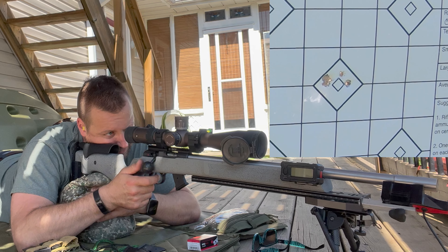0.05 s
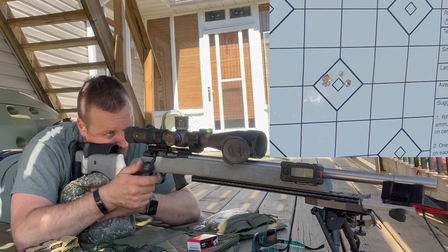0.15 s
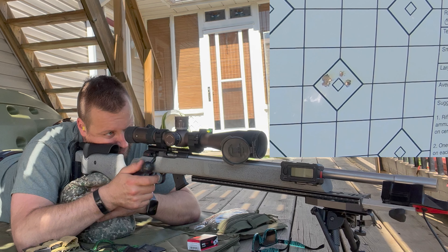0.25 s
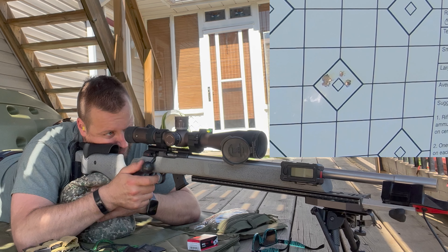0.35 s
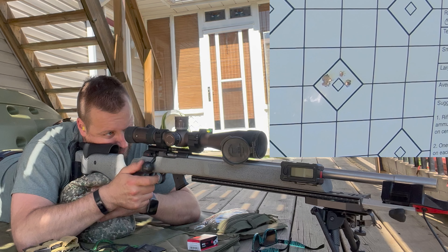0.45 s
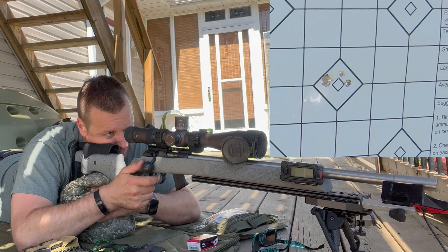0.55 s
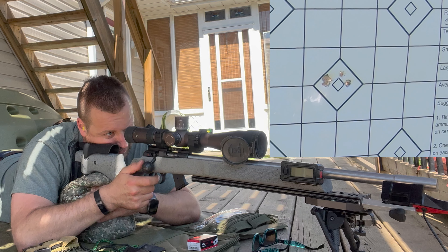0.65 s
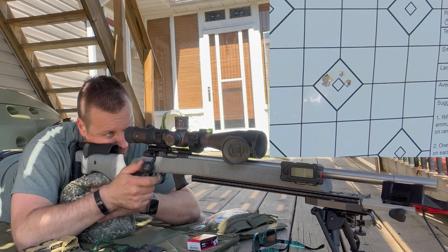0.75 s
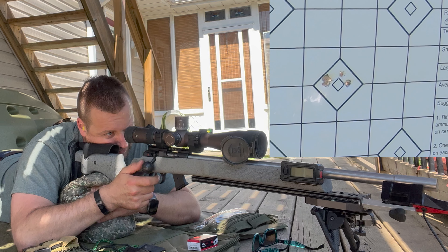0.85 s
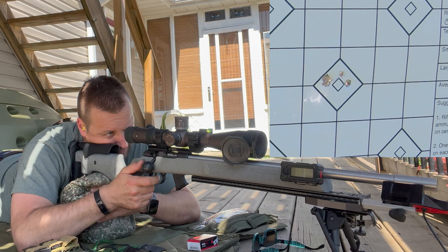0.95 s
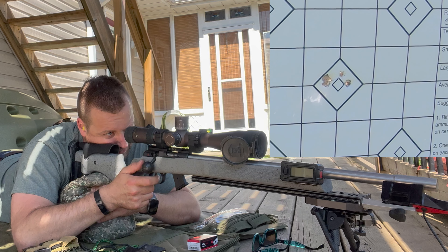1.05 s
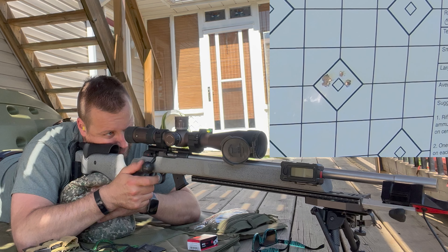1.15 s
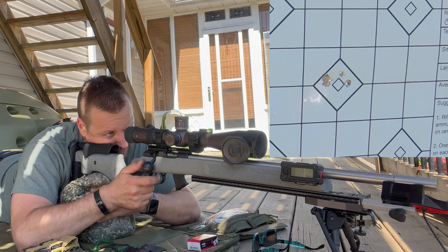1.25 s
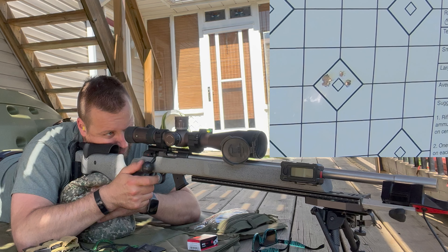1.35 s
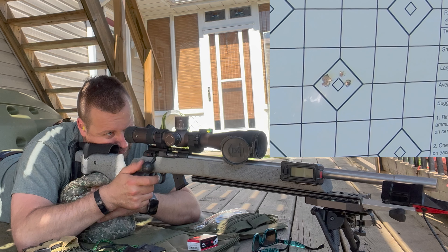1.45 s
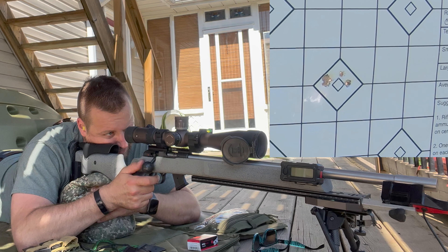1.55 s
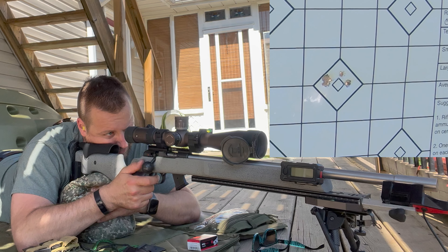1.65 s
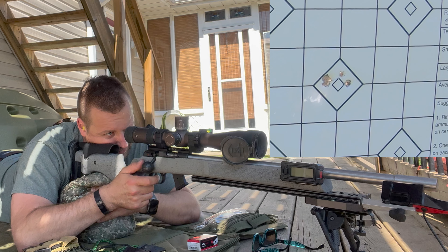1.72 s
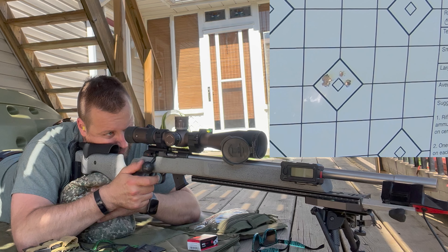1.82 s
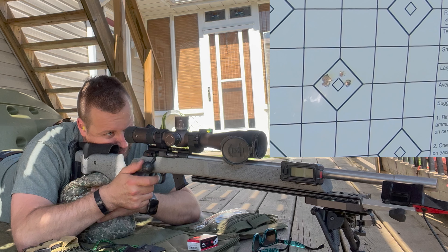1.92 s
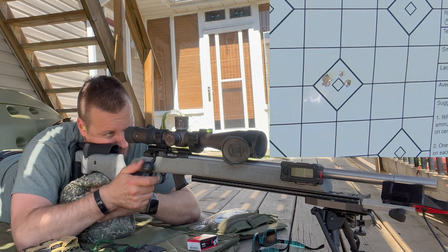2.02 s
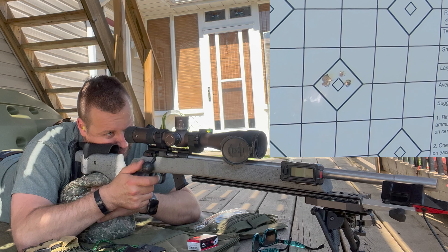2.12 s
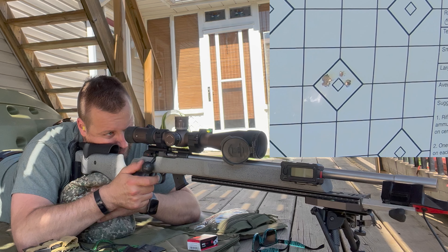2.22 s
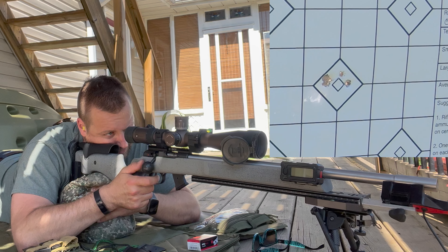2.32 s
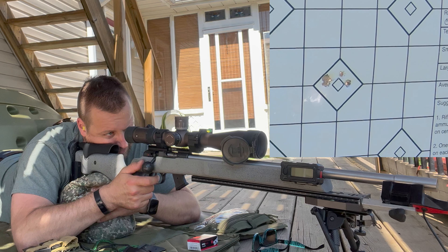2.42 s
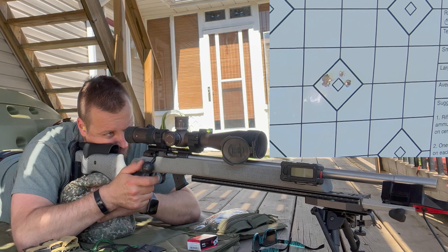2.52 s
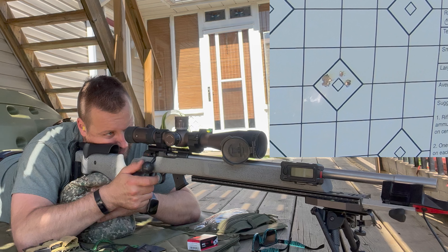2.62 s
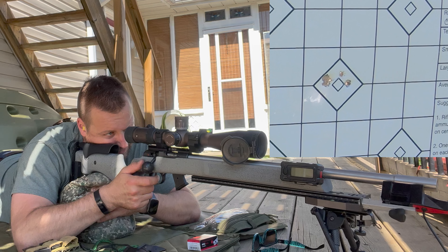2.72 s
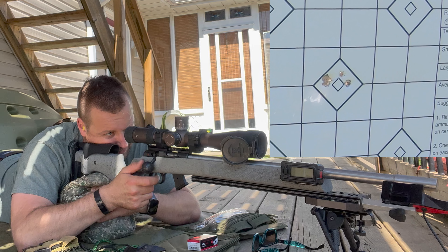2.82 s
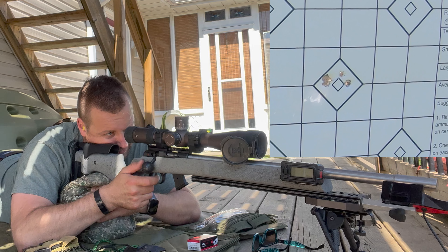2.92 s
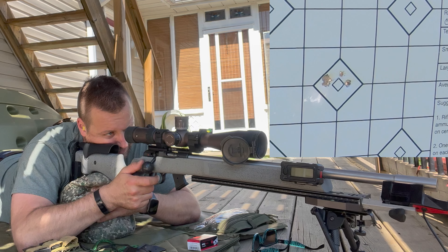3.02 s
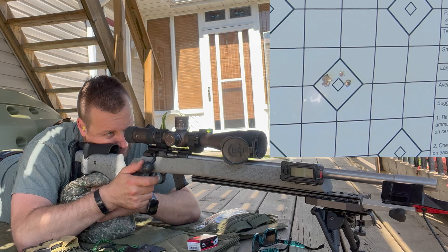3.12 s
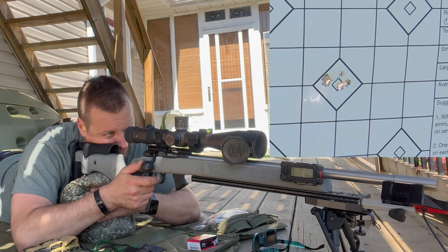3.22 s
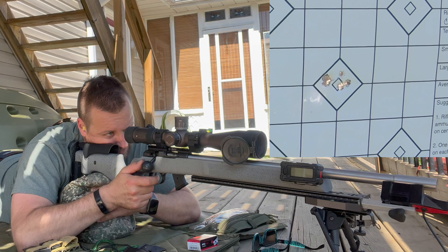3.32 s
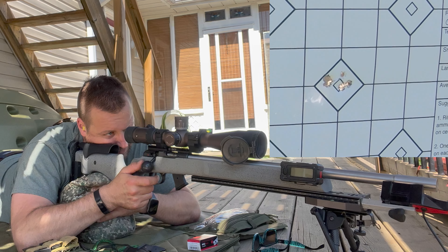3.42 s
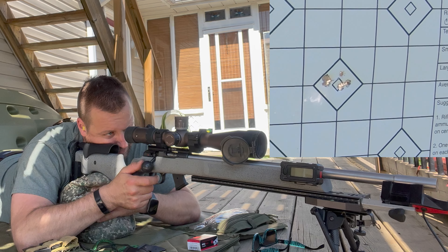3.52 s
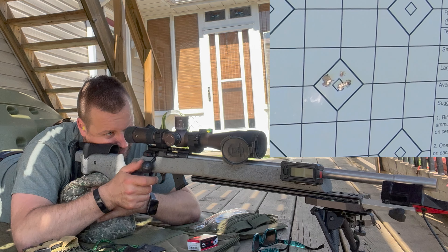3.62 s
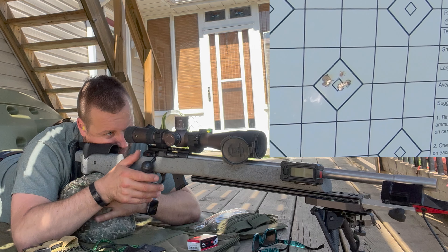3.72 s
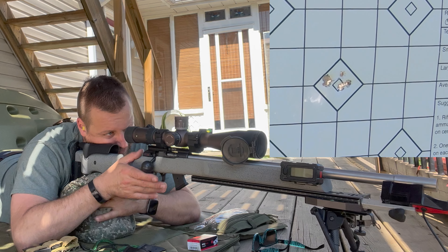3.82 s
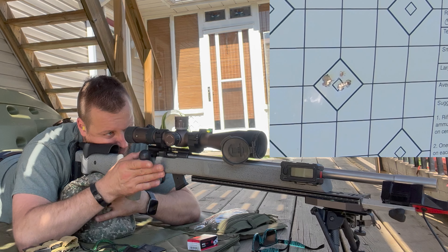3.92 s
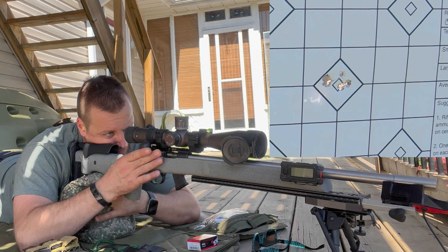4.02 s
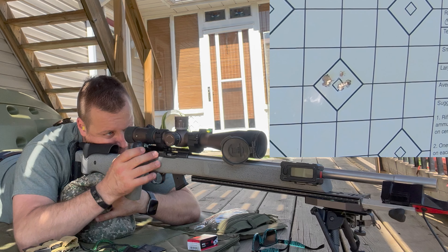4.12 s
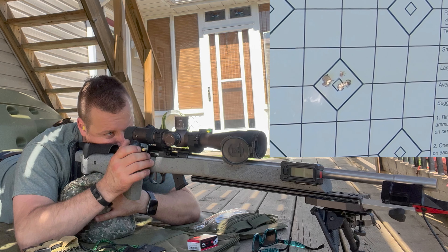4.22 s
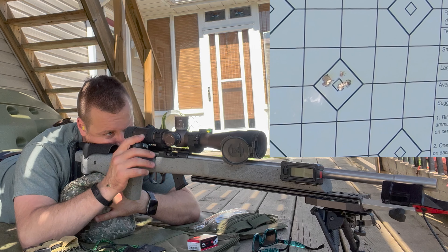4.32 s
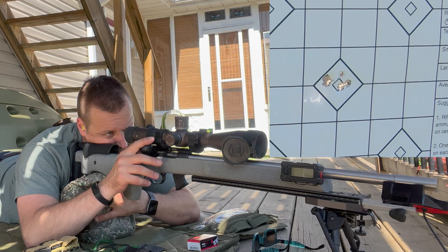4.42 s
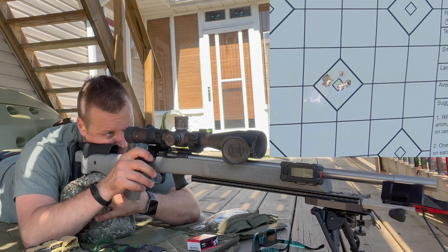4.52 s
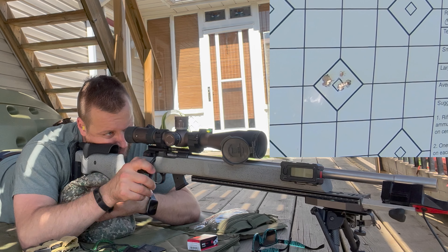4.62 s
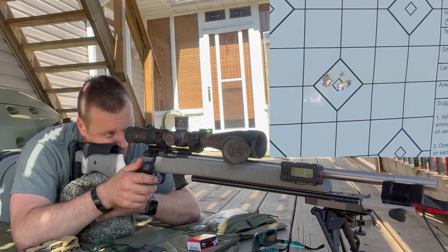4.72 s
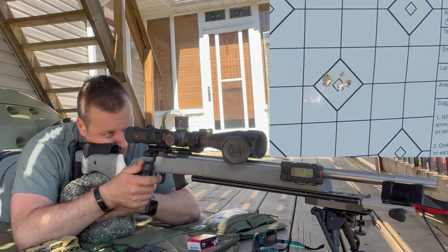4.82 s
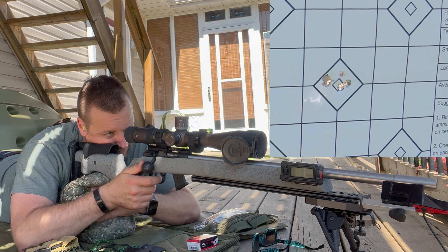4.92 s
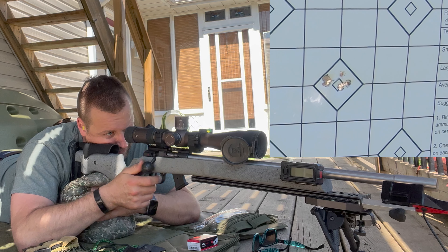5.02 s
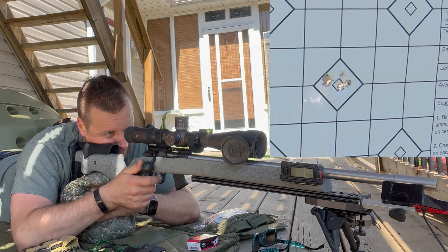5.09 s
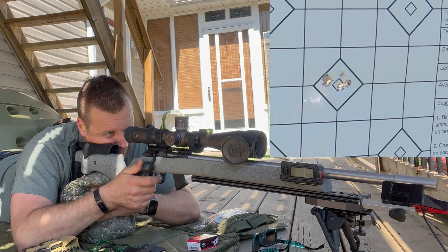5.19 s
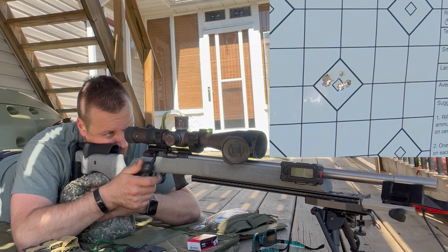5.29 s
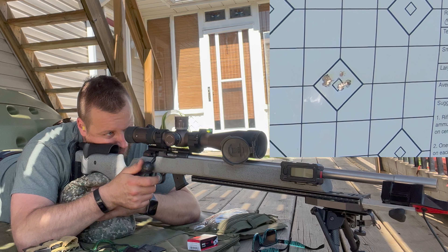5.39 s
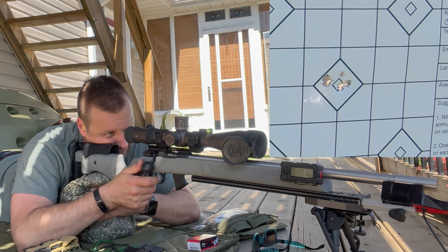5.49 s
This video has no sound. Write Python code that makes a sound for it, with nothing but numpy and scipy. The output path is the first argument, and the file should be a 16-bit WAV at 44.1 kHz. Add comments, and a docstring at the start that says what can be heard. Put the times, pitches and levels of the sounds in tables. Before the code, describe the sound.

A quiet outdoor porch for the first three seconds: a very faint throbbing low hum, soft open-air wash, thin hiss and almost inaudible, evenly spaced high bird peeps until about 2.2 s. At 3.07 s a close suppressed rifle shot bursts out, a low thump leading into a dry, sharp crack, with quick slap echoes off the house and a deep roll dying away. At 3.33 s struck steel answers from downrange with a bright, shimmering ping, and a faint echo around 3.7 s. The microphone's level dips after the blast and recovers. From 3.8 to 4.6 s the bolt is worked: hard clacks near 3.94 and 4.10, short metal scrapes, another pair near 4.32 and 4.35, then small clicks. The brass case hits the boards at 4.40, bounces softly from 4.67 and rattles out by 4.95. Hum and air remain, with a faint hollow drone swelling near 5.4 s.

```python
"""On a wooden porch at an outdoor range a muffled rifle shot cracks, and steel downrange answers with a ping.
The bolt is worked and the spent brass case bounces on the boards: brief contacts excite decaying modes.
Filtered noise makes the blast, the sliding bolt, the porch reflections, a distant hum, open air,
faint early chirps and a late far drone.
The shot makes the recorder turn its gain down; it recovers during the reload."""
import sys
import numpy as np
from scipy import signal
from scipy.fft import rfft, irfft, next_fast_len
from scipy.io import wavfile
from scipy.ndimage import uniform_filter1d, minimum_filter1d

SR = 44100
rng = np.random.default_rng(int(sys.argv[2]) if len(sys.argv) > 2 else 0)


def int16_out(signal):
    """Quantize to a 16-bit WAV file."""
    q = np.round(np.clip(np.atleast_2d(signal).T, -1, 1) * 32767)
    wavfile.write(sys.argv[1], SR, q.astype(np.int16))


N = 244755
TIME = np.arange(N) / SR  # s, the whole scene
T = TIME[:SR]  # s, the first second after an onset


def undb(db):
    """Amplitude ratio: 20 dB is a factor of ten."""
    return 10 ** (np.asarray(db) / 20)


def unit(x):
    """Normalisation to an rms of 1."""
    return x / np.sqrt(np.mean(x ** 2))


def curve(rows):
    """Linear interpolation in time of every column after the first."""
    seconds, *columns = np.transpose(rows)
    return [np.interp(TIME, seconds, column) for column in columns]


def on_log(hz, points):
    """Interpolation of (Hz, value) points on a logarithmic frequency axis."""
    point_hz, value = np.transpose(points)
    return np.interp(np.log(np.maximum(hz, 1)), np.log(point_hz), value)


def colour(x, points, size=4096):
    """Minimum-phase filtering: a folded cepstrum makes the spectrum causal; white noise keeps its power."""
    gain = unit(undb(on_log(np.fft.rfftfreq(size, 1 / SR), points)))
    cepstrum = irfft(np.log(gain))[:size // 2]
    cepstrum[1:] *= 2
    response = irfft(np.exp(rfft(cepstrum, size)))[:size // 2]
    return signal.fftconvolve(x, response[None], axes=1)[:, :x.shape[1]]


def noise(likeness, size=SR):
    """Interchannel correlation: shared and opposed noise mix to the given likeness of left and right."""
    mid, side = rng.standard_normal((2, size))
    c = np.clip(likeness, -1, 1)
    opposed = side * np.array([[1], [-1]])
    return (np.sqrt(1 + c) * mid + np.sqrt(1 - c) * opposed) / np.sqrt(2)


def fade(t60, rise, size=SR):
    """Exponential damping: a quick rise, then 60 dB of decay per t60 seconds; the peak is 1."""
    shape = (1 - np.exp(-T[:size] / rise)) * np.exp(-np.log(1000) * T[:size] / t60)
    return shape / shape.max()


def swell(s, width):
    """Gaussian envelope: a bell-shaped rise and fall around time s, peak 1."""
    return np.exp(-((TIME - s) / width) ** 2)


def walk(rate):
    """Smoothed random modulation: levels held for 1 / rate seconds and slewed twice."""
    k = int(SR / rate)
    steps = np.repeat(rng.standard_normal(N // k + 1), k)
    return 2.1 * uniform_filter1d(uniform_filter1d(steps, k), k)[:N]


def ring(modes, spread, rise=0.0011):
    """Modal synthesis: a sum of damped sines, each reaching the two sides with its own phase."""
    out = np.zeros((2, SR))
    for hz, db, t60 in modes:
        phase = rng.uniform(0, 2 * np.pi) + spread * rng.standard_normal((2, 1))
        size = min(int(2 * t60 * SR), SR)
        tone = np.sin(2 * np.pi * hz * T[:size] + phase)
        out[:, :size] += undb(db) * fade(t60, rise, size=size) * tone
    return out


def struck(modes, spread, scatter_db=3):
    """Modal variation: small random changes of level and pitch keep repeated knocks from ringing alike."""
    chance = rng.standard_normal((len(modes), 2))
    detune = 1 + .004 * chance[:, 0]
    hz, db, t60 = np.transpose(modes)
    return ring(zip(hz * detune, db + scatter_db * chance[:, 1], t60), spread)


def add(out, s, x, pan_db=0):
    """Superposition: mix a sound in at s seconds, louder on the left by pan_db."""
    start = int(s * SR)
    x = x[:, :N - start] * undb(np.array([[pan_db], [-pan_db]]) / 2)
    out[:, start:start + x.shape[1]] += x


def from_right(x, count=5):
    """Arrival-time difference: sound from the right reaches the left side a few samples late."""
    return np.array([np.roll(x[0], count), x[1]])


# Spectrum of the distant hum. Each row: frequency in Hz, relative density in dB.
HUM_SPECTRUM = [(15, -32.5), (28, -19), (45, -7), (60, -3), (76, -0.5), (100, -11.5), (130, -17),
                (190, -20), (280, -25.5), (500, -43.5), (1500, -79)]
# Course of the hum. Each row: time in seconds, level in dB before a steady 1 dB lift.
HUM_COURSE = [(0, -62), (1.15, -51), (2.1, -53), (3.05, -50), (3.9, -52), (4.65, -49), (5.55, -49.5)]


def hum():
    """Narrow low-frequency noise beats with itself; levelling its short-term power keeps the throb even."""
    (hum_db,) = curve(HUM_COURSE)
    throb = colour(noise(0.97, size=N), HUM_SPECTRUM, size=16384)
    power = uniform_filter1d(np.mean(throb ** 2, axis=0), size=8192)
    return throb * undb(hum_db + 1.0) / np.sqrt(power)


# Spectrum of the outdoor wash. Each row: frequency in Hz, relative density in dB.
AIR_SPECTRUM = [(100, -4.5), (250, -1.5), (500, -2), (750, -1), (1100, -2.5), (1700, -10.5), (2600, -13),
                (4500, -14.5), (9000, -23)]
# Spectrum of the thin even hiss. Each row: frequency in Hz, relative density in dB.
HISS_SPECTRUM = [(1000, -1.5), (5000, 0.5), (9000, -2.5), (12400, -3.5), (13500, -19.5)]
# Course of the wash. Each row: time in seconds, level in dB before a steady 2.23 dB lift,
# edge in Hz above which it falls away.
AIR_COURSE = [(0, -64, 1700), (.7, -61, 1750), (1.7, -62, 2000), (3.05, -58, 2600), (3.6, -55.5, 5200),
              (5, -60, 2400), (5.55, -57.5, 2200)]


def air():
    """Band-wise modulation: a wash with a moving upper edge, each band wavering alone over an even hiss."""
    air_db, edge_hz = curve(AIR_COURSE)
    size = next_fast_len(N)
    wash = rfft(colour(noise(.1, size=size), AIR_SPECTRUM))
    hz = np.fft.rfftfreq(size, 1 / SR)
    edges = np.r_[0, 700, 1400 * 2 ** (np.arange(9) / 3), SR / 2]  # Hz
    out = undb(-87) * colour(noise(0.091, size=N), HISS_SPECTRUM)
    for lo, hi in zip(edges, edges[1:]):
        octaves_above = np.maximum(np.log2((lo + hi) / 2 / edge_hz), 0)
        dull_db = -19 * octaves_above
        band = irfft(wash * ((hz >= lo) & (hz < hi)), size)[:, :N]
        waver_db = .7 * walk(4.8)
        add(out, 0, band * undb(air_db + dull_db + waver_db + 2.23), pan_db=1.8)
    return out


def chirps(count=7):
    """Band-pass resonance: narrow noise makes wavering peeps that swell and fade at even intervals."""
    first_s, every_s, level_db = .32, .3, -91
    narrow = signal.butter(2, [4080, 4270], "band", fs=SR, output="sos")
    peep = signal.sosfilt(narrow, noise(0.28, size=N))
    swells = sum(swell(first_s + k * every_s, .05) for k in range(count))
    return undb(level_db) * unit(peep) * swells


# Spectrum of the porch reflections. Each row: frequency in Hz, relative density in dB.
PORCH_SPECTRUM = [(100, 7), (500, 1.5), (1200, -3.5), (2500, 2.5), (4500, 1.5), (8000, 3), (12500, -3.5),
                  (15000, -23)]
# Decay of the porch. Each row: frequency in Hz, time to fall by 60 dB in seconds.
PORCH_DECAY = [(200, 0.35), (1400, .21), (3700, 0.17), (10000, 0.14)]


def porch(x):
    """Reverberation: boards, stairs and wall send back reflections that thicken; the treble dies first."""
    edges = np.r_[0, 350 * 2 ** np.arange(6), SR]  # Hz
    density = np.minimum(0.038 + T / 0.27, 1)  # share of samples that carry a reflection
    reflections = noise(0.058) * (rng.random(SR) < density) / np.sqrt(density)
    hz, scatter = np.fft.rfftfreq(SR, 1 / SR), rfft(reflections)
    tail = 0
    for lo, hi in zip(edges, edges[1:]):
        band = irfft(scatter * ((hz >= lo) & (hz < hi)))
        tail = tail + band * fade(on_log((lo + hi) / 2, PORCH_DECAY), 0.0042)
    tail = colour(tail, PORCH_SPECTRUM)
    tail = tail / np.sqrt(np.sum(tail ** 2) / 2)  # unit energy per side
    return signal.fftconvolve(x, tail, axes=1)[:, :x.shape[1]]


# Spectra of the muzzle blast, the crack, the near echo, the far echo and the low roll.
# Each row: frequency in Hz, relative density in dB.
BLAST_SPECTRUM = [(30, -3), (120, -6), (180, 5.5), (250, -4), (380, 3), (510, 11.5), (660, -5), (1300, -11),
                  (2000, -2.5), (2800, -.5), (4300, -10.5), (5800, -5), (8000, -17.5), (15000, -33)]
CRACK_SPECTRUM = [(100, -5), (1200, -7.5), (2300, 2), (6000, 2), (11000, -3.5), (14000, -11), (16000, -23)]
NEAR_ECHO_SPECTRUM = [(120, -35.5), (200, -5.5), (734, -7), (864, -8), (1660, -1), (2060, -4), (2850, -2),
                      (5360, -9.5), (9050, -11), (13000, -16), (15000, -69.5)]
FAR_ECHO_SPECTRUM = [(200, -6), (1000, -17), (1700, 1.5), (2800, -0.5), (5000, -9.5), (9000, -18),
                     (14000, -36)]
ROLL_SPECTRUM = [(15, -18.5), (30, -8), (50, -2), (75, -12.5), (130, -28.5), (300, -35), (1000, -77)]
# Resonances of the thump. Each row: frequency in Hz, relative level in dB, 60 dB decay in seconds.
THUMP_MODES = [(85, -5, .08), (177, 2, .042), (505, 0, .022)]


def shot():
    """Impulsive radiation: gas thumps, the bullet cracks, the house throws it back, the low end rolls away."""
    out = np.zeros((2, N))
    # a short low burst rises just before the crack and stops quickly
    burst = np.exp(np.minimum((T - .025) / .006, (.025 - T) / .003))
    add(out, 3.066, undb(0.3) * colour(from_right(noise(.6)) * burst, BLAST_SPECTRUM), pan_db=5)
    add(out, 3.082, undb(-6.5) * ring(THUMP_MODES, spread=.6, rise=.008), pan_db=6)
    crack = colour(from_right(noise(0.7)) * fade(0.0058, .0004), CRACK_SPECTRUM)
    add(out, 3.0925, undb(2) * (crack + undb(-15) * porch(crack)), pan_db=-0.5)
    near_echo = colour(noise(.1) * fade(.2, 0.0011), NEAR_ECHO_SPECTRUM)
    add(out, 3.1125, undb(-18) * near_echo, pan_db=-1)
    far_echo = colour(noise(.1) * fade(1.0, 0.14), FAR_ECHO_SPECTRUM)
    add(out, 3.15, undb(-46.5) * far_echo)
    # the pressure wave heaves the deck at 30 Hz, and a second swell follows at 53 Hz
    heave = fade(.07, .003) * np.sin(2 * np.pi * 30 * T) * np.ones((2, 1))
    add(out, 3.113, undb(-10.5) * heave, pan_db=-1)
    early_roll = unit(colour(noise(0.5), ROLL_SPECTRUM)) * fade(.2, .005)
    add(out, 3.097, undb(-20.5) * early_roll, pan_db=4)
    add(out, 3.172, undb(-19.5) * ring([(53, 0.011, 0.12)], spread=0.41, rise=0.014))
    late_roll = unit(colour(noise(0.63), ROLL_SPECTRUM)) * fade(0.85, 0.067)
    add(out, 3.25, undb(-38) * late_roll)
    return out


# Modes of the steel plate. Each row: frequency in Hz, relative level in dB, 60 dB decay in seconds.
STEEL_MODES = [(3025, 1, .3), (3348, 0, .35), (3817, -3, .3), (4355, -5, .42), (4683, -3, .36),
               (5771, -7, .28), (7133, -12, .3), (7429, -9, .21), (7811, -10, .17), (8926, -13, .2),
               (9868, -14, .2), (11470, -12, .14)]
# Spectrum of the scattered spray. Each row: frequency in Hz, relative density in dB.
SPRAY_SPECTRUM = [(150, 0), (400, -5.5), (600, 1), (1200, -9), (1700, 1), (3200, 4.5), (6000, -2),
                  (9000, -3), (12500, -13), (14500, -41)]


def ping():
    """Plate vibration: paired modes of struck steel beat amid a bright spray; a soft echo returns from far."""
    out = np.zeros((2, N))
    strike_s = 3.3265
    twins = [(hz + rng.uniform(8, 30), db - 9, t60) for hz, db, t60 in STEEL_MODES]
    add(out, strike_s, undb(-30) * ring(STEEL_MODES + twins, spread=1.0, rise=0.0017))
    late_spray = fade(0.15, 0.042) * np.minimum(T / 0.024, 1)
    spray = fade(.23, 0.00028) + undb(-8) * late_spray
    add(out, strike_s, undb(-26) * colour(noise(0.055) * spray, SPRAY_SPECTRUM))
    # the low modes come back along many paths at once, so they swell and waver
    paths = noise(0.18) * np.exp(-np.abs(T - .14) / .045)
    echo = signal.fftconvolve(ring(STEEL_MODES[:4], spread=.9), paths, axes=1)[:, :SR]
    add(out, 3.6, undb(-60.5) * unit(echo))
    return out


# Modes of the deck boards. Each row: frequency in Hz, relative level in dB, 60 dB decay in seconds.
BOARD_MODES = [(149, -12, 0.17), (285, -11, 0.072), (380, -6, 0.065), (449, -6, .06), (510, -4.5, 0.049),
               (581, -5.5, 0.092), (654, -3.5, 0.03), (820, -1.5, 0.037)]


def knocks(rows, modes, t60, rise, clack_db, thud_db, tick_db, ring_db, body_db, body_t60, deck_db):
    """Impact excitation: micro-impacts ring metal, body and deck; a harder contact trades thud for tick."""
    out = np.zeros((2, N))
    for s, force, hardness, body_hz in rows:
        low = force - hardness + thud_db
        mid = force + clack_db
        top = force + hardness + tick_db
        spectrum = [(120, low - 17), (420, low - 1), (1100, low), (2000, mid + 1), (4800, mid),
                    (7500, top + 1), (11000, top - 3), (15500, top - 5.5 + hardness / 2)]
        # colour() normalises the spectrum, so its overall strength is given back
        gain = undb(on_log(np.linspace(0, SR / 2, 512), spectrum))
        strength = np.sqrt(np.mean(gain ** 2))
        contact = from_right(noise(0.71)) * fade(t60, rise)
        metal = undb(ring_db) * struck(modes, spread=0.52)
        add(out, s, strength * colour(contact + metal, spectrum, size=1024))
        body = from_right(ring([(body_hz, 0, body_t60)], spread=.2))
        add(out, s, undb(low + body_db) * body)
        add(out, s, undb(low + deck_db) * struck(BOARD_MODES, spread=0.69))
    return out


# The bolt meeting its stops. Each row: start in seconds, relative force in dB,
# hardness of the contact in dB, body resonance in Hz.
BOLT_CONTACTS = [(3.793, -45, 4, 1000), (3.907, -47, -9, 960), (3.9372, -16.5, 1, 1965),
                 (4.052, -37, 2, 2770), (4.0827, -27.5, 2, 1990), (4.1004, -17.5, 2, 2750),
                 (4.1035, -18, -1, 620), (4.2982, -45, 7.5, 2040), (4.3204, -24.5, 2, 2000),
                 (4.3538, -18.5, 6, 2040), (4.4425, -34.5, 2.5, 465), (4.5222, -32, 6, 988),
                 (4.5236, -34, -8.5, 960), (4.5326, -39, -9, 480), (4.566, -33, -8.5, 1260)]
# Modes of the rifle action. Each row: frequency in Hz, relative level in dB, 60 dB decay in seconds.
BOLT_MODES = [(480, -11, 0.083), (642, 3, 0.07), (948, -4, 0.23), (1242, 0, 0.12), (1573, 1, 0.064),
              (2067, 1, 0.084), (2600, -27.5, .12), (3190, -7, 0.23), (3875, 2.5, 0.05), (4210, -8, 0.18),
              (4516, -12, 0.17), (4910, 10, 0.027), (5970, -5, 0.18), (7300, -5, .12), (7780, -9, 0.083),
              (9750, 11, 0.035)]


def bolt():
    """Impact of metal on metal: the bolt is lifted, drawn back, run forward and locked."""
    return knocks(BOLT_CONTACTS, BOLT_MODES, t60=0.0095, rise=0.00114, clack_db=8.5, thud_db=5.5,
                  tick_db=2.5, ring_db=-30, body_db=-11, body_t60=0.027, deck_db=-25)


# The bolt sliding in its raceway. Each row: start in seconds, length in seconds,
# level in dB before the stroke's envelope.
BOLT_SLIDES = [(3.929, 0.035, -37), (4.043, 0.11, -39.5), (4.315, 0.052, -40), (4.363, 0.044, -46),
               (4.435, 0.04, -53)]
# Spectrum of the rubbing. Each row: frequency in Hz, relative density in dB.
RUB_SPECTRUM = [(300, -9), (1200, -3.5), (2500, 1), (8000, -9.5), (12000, -1.5), (16000, -22)]


def slides():
    """Friction noise: steel rubbing on steel is a run of tiny uneven catches."""
    out = np.zeros((2, N))
    for s, length, db in BOLT_SLIDES:
        happens = rng.random(SR) < 900 / SR  # about 900 catches a second
        catches = happens * undb(1.2 * rng.exponential(size=SR)) * rng.standard_normal(SR)
        rub = colour(from_right(np.array([catches, catches])), RUB_SPECTRUM, size=1024)
        stroke = np.sqrt(np.abs(np.sin(np.pi * np.minimum(T / length, 1))))
        add(out, s, undb(db) * unit(rub) * stroke)
    return out


def rattle(count=5):
    """Inelastic bouncing: the last hops of the case crowd together and die away."""
    start_s, hop_s, hop_keeps = 4.7934, .031, .89
    force_db, hop_loss_db, hardness_db, body_hz = -47, 1.8, -7.5, 830
    hop = np.arange(count)
    times = start_s + np.r_[0, np.cumsum(hop_s * hop_keeps ** hop)]
    return [(times[k], force_db - hop_loss_db * k, hardness_db, body_hz) for k in hop]


# The case landing on the boards. Each row: start in seconds, relative force in dB,
# hardness of the contact in dB, body resonance in Hz.
CASE_LANDINGS = [(4.401, -24.5, -2, 1504), (4.6735, -39.5, -5, 1600), (4.748, -49.5, -8.5, 1280),
                 (4.7826, -40.5, -1, 1323)]
# Modes of the brass case. Each row: frequency in Hz, relative level in dB, 60 dB decay in seconds.
BRASS_MODES = [(770, -1, .05), (1540, 0, .05), (2100, -2, .06), (4160, -10, .15), (12555, 4, .15),
               (12610, -3, .12)]


def case():
    """Impact of a light shell: the brass case bounces on the boards and rattles to rest."""
    return knocks(CASE_LANDINGS + rattle(), BRASS_MODES, t60=0.017, rise=0.0013, clack_db=7.5, thud_db=4.5,
                  tick_db=2.5, ring_db=-15.5, body_db=-12.5, body_t60=0.039, deck_db=-27)


# Spectrum of the far drone. Each row: frequency in Hz, relative density in dB.
DRONE_SPECTRUM = [(200, -45), (450, -28), (680, -6), (760, 2.5), (850, -3.5), (1100, -9.5), (1600, -35.5),
                  (5000, -70)]


def drone():
    """Narrow-band noise under a Gaussian envelope: a hollow rush swells and recedes in the distance."""
    peak_s, width_s, level_db = 5.38, .38, -67.5
    rush = colour(noise(0.092, size=N), DRONE_SPECTRUM)
    return undb(level_db) * swell(peak_s, width_s) * rush


def gain_control(x, size=882):
    """Dynamic range compression: a loud sound turns the gain down; it holds, then creeps back up."""
    threshold_db, duck_db, recover_db_per_s = -17, 10, 14
    hold_s, look_ahead_s = .8, .02
    power = uniform_filter1d(np.mean(x ** 2, axis=0), size=size)
    power_db = 10 * np.log10(np.maximum(power, 1e-12))
    level_db = np.interp(TIME + look_ahead_s, TIME, power_db)
    hold = int(hold_s * SR)
    wanted_db = np.clip(threshold_db - level_db, -duck_db, 0)
    held_db = minimum_filter1d(wanted_db, size=hold, origin=(hold - 1) // 2)
    # the gain may fall at once but rise no faster than the recovery slope
    recovery_db = recover_db_per_s * TIME
    return x * undb(np.minimum.accumulate(held_db - recovery_db) + recovery_db)


def scene():
    """Superposition of the backdrop, the shot with its ping, and the reload with its porch reflections."""
    near = bolt() + slides() + case()
    reload = near + undb(-8.5) * porch(near)
    return hum() + air() + chirps() + shot() + ping() + reload + drone()


def record(dry):
    """Compression, saturation and low-pass filtering: the gain ducks, peaks round off, the top is cut."""
    rounded = np.tanh(gain_control(dry))
    low_pass = signal.ellip(8, .2, 70, 16000, fs=SR, output="sos")  # edge at 16 kHz
    return signal.sosfilt(low_pass, rounded)


dry = scene()
out = record(dry)
int16_out(out)
```